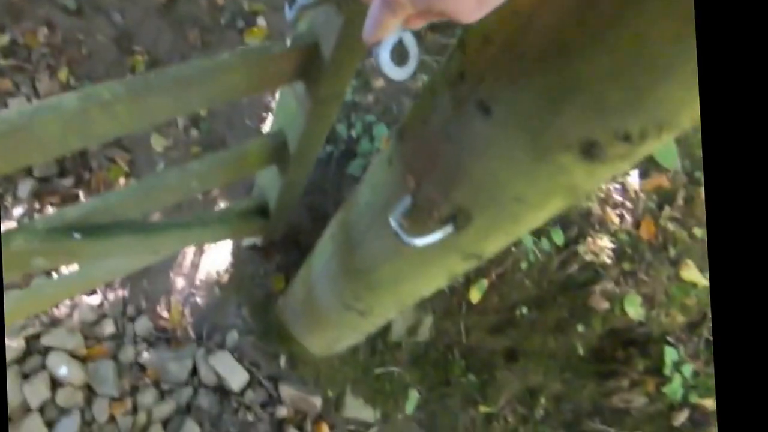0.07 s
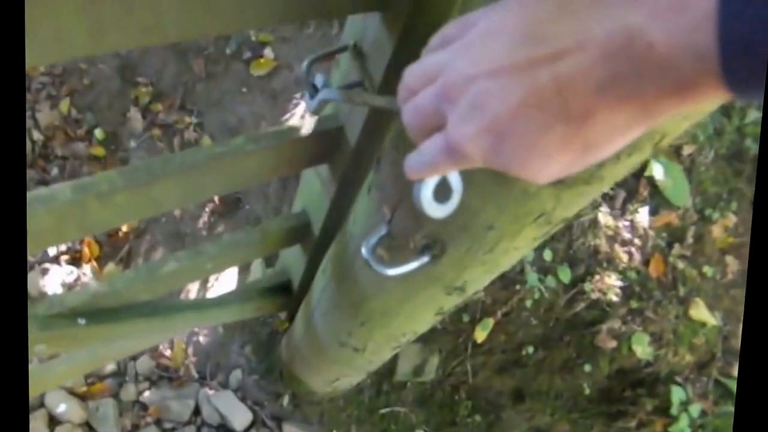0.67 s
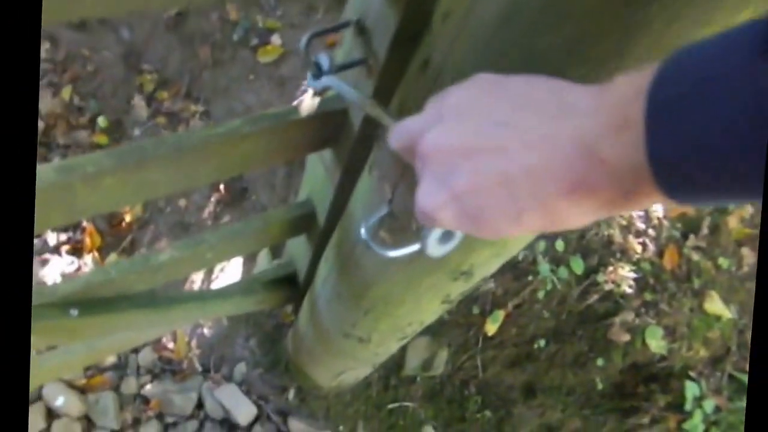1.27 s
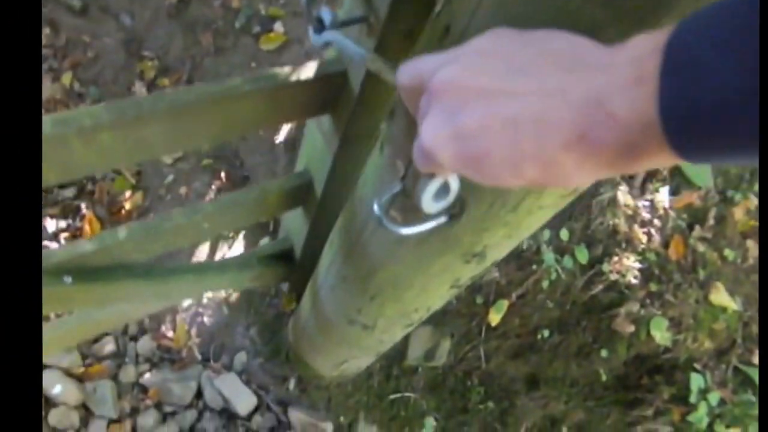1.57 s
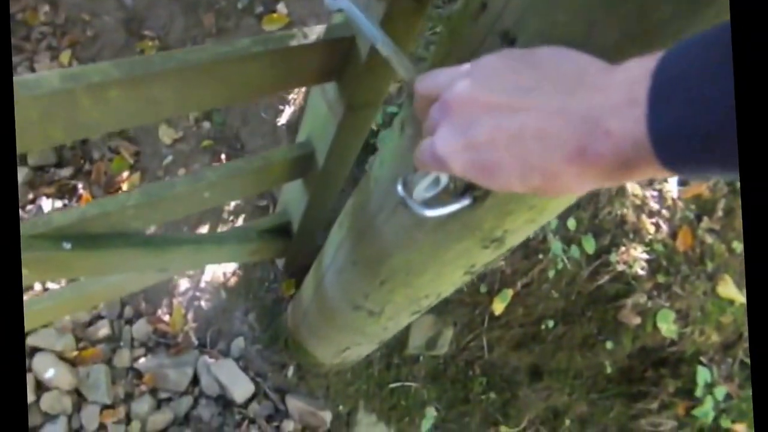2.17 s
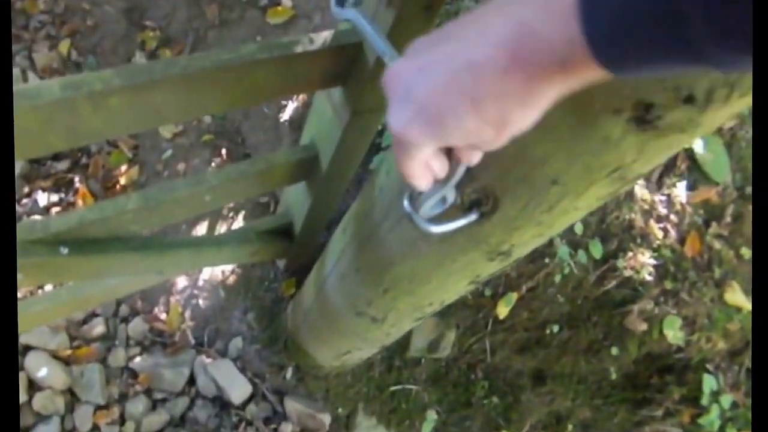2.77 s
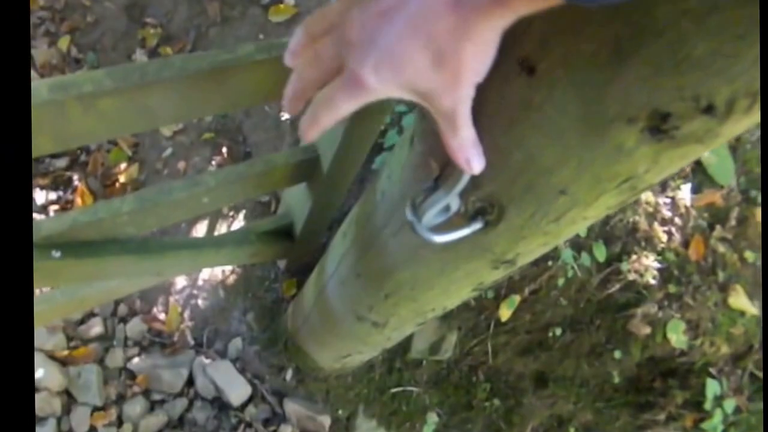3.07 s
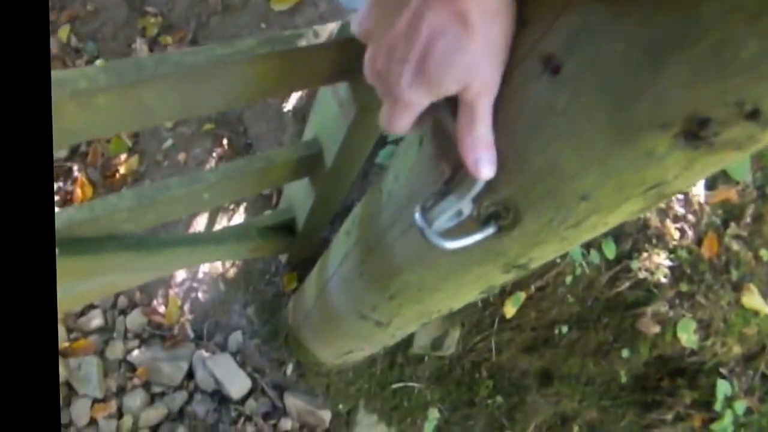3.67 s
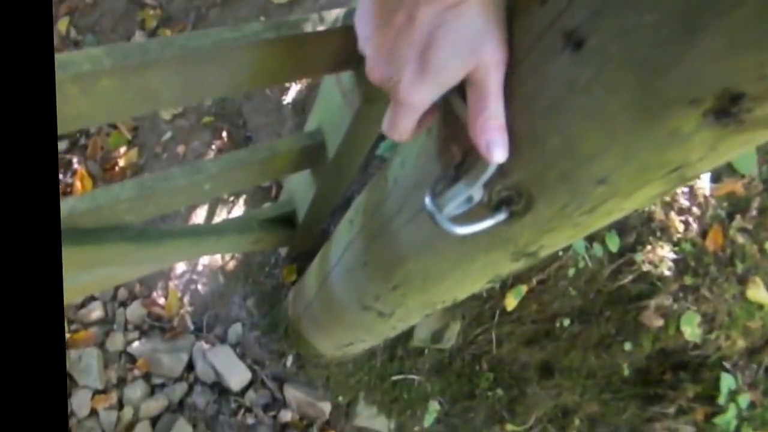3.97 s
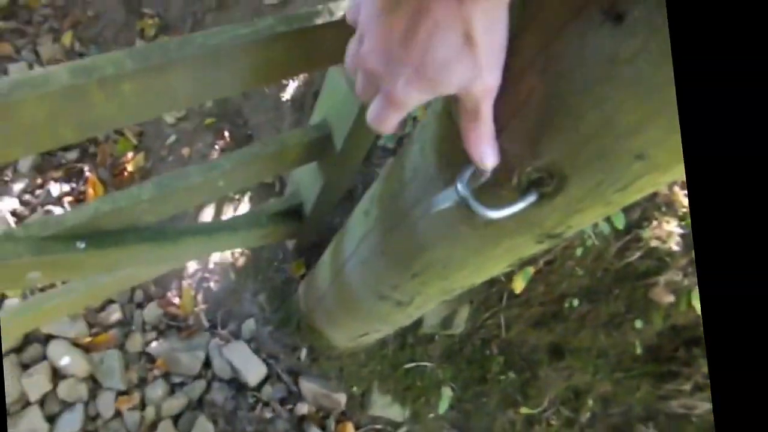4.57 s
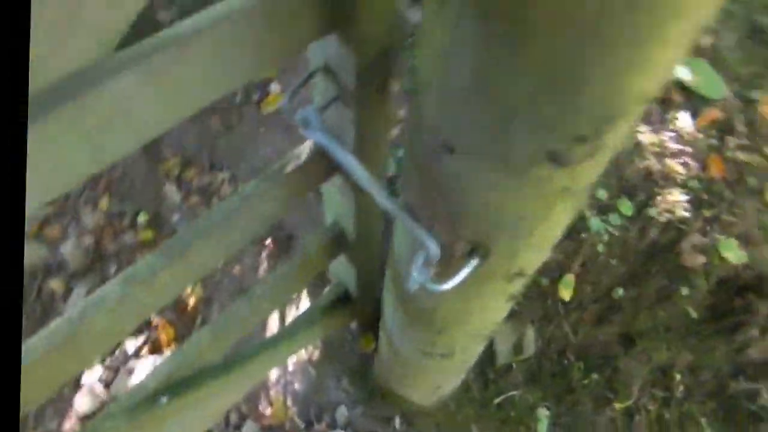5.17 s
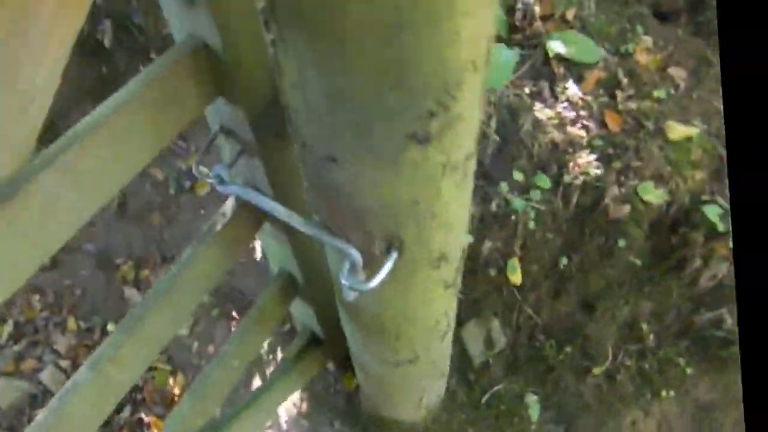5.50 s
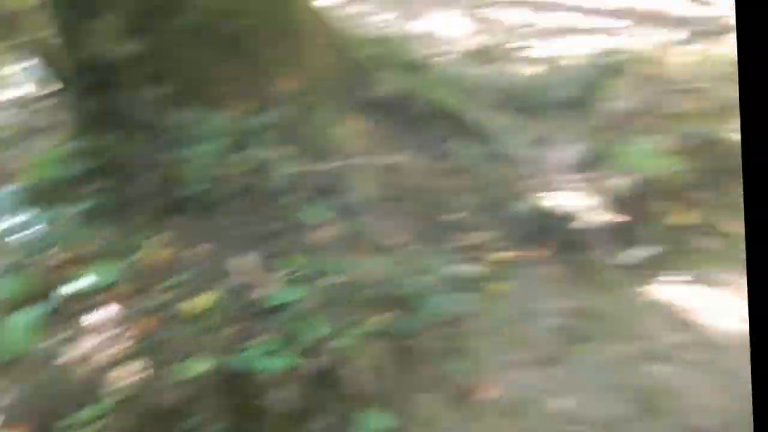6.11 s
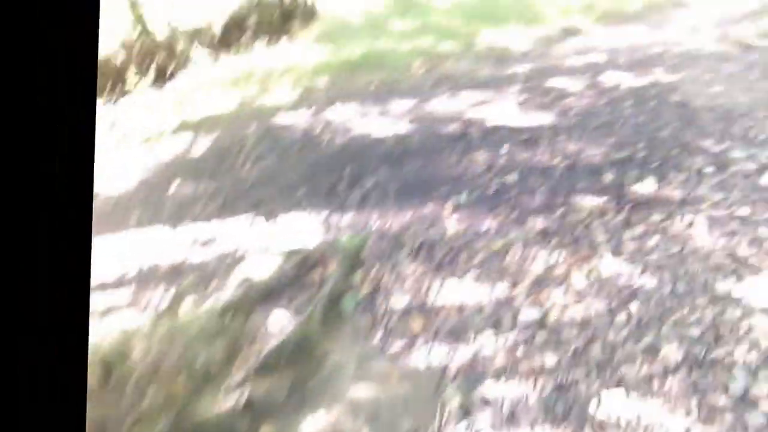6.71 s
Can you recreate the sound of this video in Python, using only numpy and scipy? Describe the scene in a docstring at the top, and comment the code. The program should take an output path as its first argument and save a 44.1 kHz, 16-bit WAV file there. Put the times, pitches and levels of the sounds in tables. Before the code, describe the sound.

Outdoors, over a faint hush of far leaves, a steel gate hook is worked by hand into its staple right by the microphone. After some handling bumps come two bouts of metal clacks and grinding, the second louder and with a brief squeak, with soft sleeve swishes between. The released hook rattles and rings as the wooden gate knocks, then stops. A few gravel steps and a low wind rumble follow.

```python
"""A steel gate hook, worked by hand into the staple on a wooden post, close up and outdoors.
Held, it clacks, grinds and squeals as steel sticks and slips on steel, and the gate knocks under it.
Let go, it is jolted taut and dropped slack by turns, bouncing and ringing until it seats.
A sleeve swishes and fingers bump the microphone over a bed of far leaves and a faint drone.
Gravel snaps underfoot and low gusts of wind roll in as the walker turns away."""
import sys
import numpy as np
from scipy import signal
from scipy.fft import rfft, irfft
from scipy.io import wavfile
from scipy.ndimage import uniform_filter1d

SR = 44100
rng = np.random.default_rng(int(sys.argv[2]) if len(sys.argv) > 2 else 0)


def output_pcm(signal):
    """Save a mono or channel-first signal as 16-bit PCM at the path in sys.argv[1].

    Samples are clipped to [-1, 1] before scaling.
    """
    pcm = np.clip(np.atleast_2d(signal).T, -1, 1) * 32767
    wavfile.write(sys.argv[1], SR, np.round(pcm).astype(np.int16))


N = 301984
TIME = np.arange(N) / SR
SEATED_S, WALK_S = 5.162, 5.97  # the hook comes to rest; the walker turns away
USUAL_HARD_HZ, FIRM_DB = 4000, -30  # reference points: an ordinary contact, a firm push

# tone of the distant leaves: freq_hz, level_db
LEAVES_EQ = [(20, -43), (45, -8), (85, -12.5), (130, -6), (200, -2), (400, -1.5), (800, -1), (1150, -6.5),
             (2100, -7.5), (3500, -12.5), (6000, -18), (10000, -24), (16000, -31)]
# how alike the leaves sound left and right: freq_hz, correlation
LEAVES_LIKENESS = [(60, 0.46), (130, 0.56), (290, 0.737), (640, 0.904), (1410, 0.863), (3100, 0.782),
                   (6820, 0.66), (15000, 0.69)]
# fingers and cuff on the microphone, and around 5.4 s soft footsteps or gate knocks: middle_s, length_s,
# level_db, pitch_hz
BUMPS = [(0.042, 0.0244, -37.5, 395), (.074, 0.013, -27, 376), (0.083, 0.0101, -26, 433),
         (0.09, 0.021, -19, 424), (0.108, 0.022, -26, 400), (0.123, 0.019, -21, 432),
         (0.163, 0.012, -26.5, 341), (0.176, 0.026, -31, 295.6), (0.197, .018, -33.5, 462),
         (0.345, 0.0144, -38.5, 370), (3.062, 0.026, -45, 707), (3.532, .019, -42, 460),
         (5.331, 0.0316, -34.5, 389), (5.362, 0.048, -40.5, 460), (5.453, 0.0545, -44.5, 429),
         (5.51, .015, -41, 446.3)]
# tone of the cloth crackle in a bump: freq_hz, level_db
CRACKLE_EQ = [(100, 8), (250, 12), (800, -19.5), (1500, 5.5), (2400, -10), (4000, -0.5), (7000, -1),
              (10000, -9), (16000, -17)]
# sleeve strokes: middle_s, stroke_s, level_db, tilt_db_per_octave, grain_spread_db
SWISHES = [(0.04, 0.07, -52, 2, 3), (0.097, 0.05, -38, 2, 2), (0.165, 0.14, -44.5, 1.6, 2.5),
           (.72, .17, -53.5, 3.8, 2), (.89, .2, -56, 1, 2), (1.889, 0.473, -59, 0.5, 2),
           (2.79, 0.13, -49, 2.5, 2), (3.058, .1, -60.5, 3, 3), (3.161, 0.0818, -44, -.5, 2),
           (3.502, 0.23, -56, 1.5, 3), (3.635, .14, -43.5, -.7, 2), (3.95, 0.125, -46, -1, 2),
           (4.07, 0.085, -45.5, 1, 2), (5.225, 0.15, -54, 1, 7), (5.352, 0.07, -42, 0.5, 4.5),
           (5.445, 0.15, -44, 0.5, 5), (5.572, 0.098, -45, 1.8, 4), (6.275, 0.15, -45, 1.3, 6),
           (6.44, 0.14, -49, -.5, 5), (6.825, .05, -46, 1.5, 6)]
# tone of the rubbing sleeve: freq_hz, level_db
SLEEVE_EQ = [(150, -10), (500, -2.5), (1500, 4), (3500, 3.5), (6000, -1), (10000, -7.5), (16000, -14)]
# sharp snaps of cloth, twigs and gravel: start_s, level_db, pitch_hz, t60_s
SNAPS = [(.0393, -34, 5000, .012), (0.0894, -21.5, 1700, 0.013), (0.0963, -22, 6160, 0.0108),
         (.162, -25.5, 746, 0.019), (.177, -29, 1400, .02), (0.1195, -12.5, 6000, 0.0098),
         (.1314, -23, 6940, 0.02), (1.3225, -44, 5000, .012), (3.8012, -31, 6620, 0.0155),
         (5.34, -29, 4000, 0.02), (5.348, -35, 10000, .02), (5.417, -39, 11000, .012),
         (5.447, -33, 5500, .018), (5.478, -41, 8500, .012), (5.495, -37, 6500, .014),
         (5.509, -18, 2900, 0.01), (5.5285, -35, 7000, .012), (5.606, -39, 10500, .012),
         (5.608, -33, 3000, 0.0091), (6.028, -40, 10000, .012), (6.057, -35, 2090, 0.02),
         (6.423, -40, 6000, .02), (6.5488, -31, 6450, 0.0075), (6.727, -35, 3300, .015),
         (6.754, -29, 840, 0.085), (6.767, -20, 1600, 0.03), (6.829, -35, 3300, .02)]
# soft thuds of gate, hand and feet: start_s, relative_db, pitch_hz, t60_s
THUDS = [(0.922, -34, 170, 0.112), (.944, -42.5, 267, 0.39), (2.073, -36.5, 205, 0.3),
         (2.226, -36, 295, 0.34), (4.686, -46, 58, 0.2), (4.686, -30, 290, 0.15), (5.99, -39, 220, .1),
         (6.108, -30, 130, 0.081), (6.173, -29.5, 135, 0.08), (6.311, -27.5, 135, 0.033),
         (6.334, -34, 440, .035)]
# modes of the hook hanging free: pitch_hz, level_db, t60_s
HOOK_MODES = [(1525, -5, .16), (2536, -3, .13), (2900, -4, .1), (4200, -6, .19), (4850, -10, .2),
              (5605, -10, .2), (6118, -5, .14), (7308, -6, .22), (7960, -5, .16), (8344, -5, .18),
              (9358, -6, .11), (10889, -12, .27), (12210, -13, .12), (14665, -23, .15), (15305, -17, .17)]
# modes of the hook pressed on the staple: pitch_hz, level_db, t60_s
STAPLE_MODES = [(996, 2, 0.007), (1236, -15, 0.12), (1373, -16, 0.173), (1525.6, 0, 0.047),
                (1870, 6, 0.018), (1942, -2, 0.041), (2605, 8, 0.02), (3276, 11, 0.034), (3683, 7, 0.051),
                (5240, 3, 0.022), (5550, 13, 0.0143), (6412, 10.5, 0.013)]
# modes of the wooden gate and post: pitch_hz, level_db, t60_s
TIMBER_MODES = [(127.2, -10, 0.093), (195, -10, 0.2), (279, -1, 0.14), (376, 1, 0.13), (432, 0, 0.12),
                (520, 1, 0.07), (577, 5, 0.09), (640, 2, 0.06), (764, 6, 0.05), (860, 2, 0.05),
                (964, -2, 0.05)]
# broad tone of steel hitting steel: freq_hz, level_db
CLACK_EQ = [(100, -19), (350, -8), (700, 0), (1100, -3.5), (1600, 1), (1950, 2), (2270, -7), (2650, -0.5),
            (3100, 0), (4200, -8.5), (5600, -7), (8000, -10), (11000, -8.5), (16000, -9.5)]
# the hand pushes the hook against the staple (looseness runs from 0, gripped, to 1, free):
# start_s, level_db, hardness_hz, pinch_hz, favoured_hz, looseness
PUSHES = [(1.444, -28, 4050, 1630, 3000, 0.02), (2.0669, -12, 7000, 1710, 4850, 0.28),
          (2.0700, -15.5, 6500, 2780, 5610, 0.03), (2.1622, -28.5, 4760, 1296, 5600, 0.01),
          (2.2302, -22.5, 4200, 2030, 6100, .1), (2.3068, -11.5, 4000, 2625, 2520, 0.01),
          (2.356, -27, 2600, 1650, 3100, 0.1), (2.404, -25, 1980, 843, 3050, 0.02),
          (3.747, -31, 1223, 804, 2550, 0.4), (3.799, -35, 1200, 820, 2550, .1),
          (3.833, -36, 1300, 850, 2550, .1), (4.2212, -28, 4720, 1180, 7300, 0.05),
          (4.2592, -13.5, 2400, 1070, 3070, 0.3), (4.2836, -17, 3600, 1800, 7300, .1),
          (4.295, -4, 3600, 1500, 5650, .08), (4.3215, -25, 3000, 1900, 6100, .2),
          (4.3373, -22, 3020, 2920, 3084, 0.52), (4.4134, -10.5, 12000, 1680, 5700, 0.22),
          (4.4268, -13.5, 9800, 3226, 7300, 0.31), (4.4338, -17, 6030, 2050, 5600, 0.05),
          (4.4685, -24.5, 5170, 2800, 5600, 0.38), (4.5175, -22, 4250, 1520, 1530, 0.6),
          (4.5265, -27.5, 4000, 3500, 1530, .3)]
# the swinging gate pulls the hook taut: start_s, level_db, hardness_hz, pinch_hz, knock_db, knock_hz
JOLTS = [(2.2225, -16, 4600, 780, -16.5, 780), (4.6821, -8, 7350, 2800, -14.5, 540),
         (4.7348, -18, 3980, 1900, -21.5, 520), (4.8771, -21, 3900, 2900, -21.5, 700),
         (5.0645, -18, 6100, 1700, -20, 570)]
# the slack hook lands on the staple, each drop followed by a rebound:
# start_s, level_db, hardness_hz, pinch_hz, ring_offset_db, favoured_hz, spread_ratio, looseness
DROPS = [(4.7834, -15.5, 10100, 1398, -11.5, 8250, 0.05, 1),
         (4.7945, -17, 6000, 1450, -12.5, 2536, 0.05, 0.97),
         (5.004, -19.5, 7610, 1706, -14, 7960, 0.05, 0.95),
         (5.0125, -19, 4500, 1100, -13, 7308, 0.04, 0.88), (5.1253, -20, 6000, 1150, -16, 12210, 0.1, 0.8),
         (5.1325, -19.5, 4000, 1900, -17, 7308, 0.04, 0.8)]
# the hook drags on the staple until it gives: peak_s, build_s, release_s, rasp_db, groan_db, groan_hz
DRAGS = [(2.224, 0.028, 0.03, -35, -29, 780), (2.242, .01, .035, -42, -26, 600),
         (2.276, 0.008, 0.045, -43, -30, 380), (4.292, 0.0446, 0.016, -23.5, -30, 640),
         (4.32, .015, 0.055, -31, -26.5, 540), (4.42, 0.033, 0.035, -26.5, -25, 585),
         (4.475, 0.015, 0.051, -36.5, -35, 620), (4.535, 0.029, .08, -32.5, -33, 770),
         (4.645, 0.028, 0.025, -44, -34.5, 430), (4.679, .02, 0.002, -40, -28, 420),
         (4.733, 0.01396, 0.0026, -35, -34, 520), (4.853, 0.00457, 0.018, -45, -41, 500),
         (5.126, 0.0089, 0.0035, -33, -42, 600)]
# path of the squeak just before the hook gives: time_s, slip_rate_hz, level_db
SQUEAK_CURVE = [(4.249, 650, -50), (4.253, 630, -25), (4.268, 650, -28), (4.279, 635, -21.5),
                (4.286, 622, -15), (4.295, 622, -20), (4.304, 665.3, -26), (4.309, 650, -39)]
# overtones of the squeak: harmonic_number, level_db
SQUEAK_PARTIALS = [(1, -19), (2, -1), (3, 0.5), (4, -20), (5, -11.5), (6, -14), (7, -22.5), (8, -19),
                   (9, -29), (10, -30), (12, -24)]
# path of the squeal under the hardest push: time_s, pitch_hz, level_db
SQUEAL_CURVE = [(4.25, 1040, -36), (4.26, 1080, -18.5), (4.269, 1140, -31), (4.278, 1280, -23),
                (4.294, 1410, -19), (4.308, 1400, -34)]
# gusts on the microphone: peak_s, relative_db, fall_db_per_s
GUSTS = [(6.09, -34, 124.5), (6.33, -37, 31.5)]
# tone of the wind rumble: freq_hz, level_db
WIND_EQ = [(15, -16.5), (40, -13), (90, -1), (160, -8.5), (300, -17), (600, -39), (2000, -73.5)]
# a shoe scuffs the path: middle_s, length_s, level_db, pitch_hz, width_hz
SCUFFS = [(6.058, .03, -39, 2170, 250), (6.249, 0.053, -35.5, 568, 520), (6.28, 0.12, -38.5, 730, 900),
          (6.536, 0.41, -48, 1930, 257), (6.751, 0.288, -48, 1840, 600)]
# stereo balance of the microphone: freq_hz, left_minus_right_db
BALANCE = [(60, 2), (110, 1), (200, 1.0), (380, 1), (700, 1), (1290, 0), (2380, 1), (4400, 2.0), (8120, 2),
           (15000, 0)]


def amp(db):
    """Decibels to gain."""
    return 10 ** (np.asarray(db) / 20)


def unit_rms(x):
    """Scales to an rms of one."""
    return x / np.sqrt(np.mean(x ** 2) + 1e-20)


def curve_at(points, hz):
    """Reads a table on a log-frequency axis."""
    freq, value = np.transpose(points)
    return np.interp(np.log(hz + 1), np.log(freq + 1), value)


def add(mix, s, sound):
    """Mixes a sound in, starting at s seconds."""
    part = mix[max(round(s * SR), 0):][:len(sound)]
    part += sound[:len(part)]


def colour(x, eq, tilt_db=0):
    """Applies an EQ curve and a tilt per octave, at unit level."""
    hz = np.fft.rfftfreq(len(x), 1 / SR)
    gain = amp(curve_at(eq, hz) + tilt_db * np.log2(hz / 1000 + .5))
    return unit_rms(irfft(rfft(x) * gain, len(x)))


def band(hz, width_hz, size=16384):
    """Noise in one resonance, at unit level."""
    freq = np.fft.rfftfreq(size, 1 / SR) + 1
    off_centre = (freq * freq - hz * hz) / (freq * width_hz)
    return unit_rms(irfft(rfft(rng.standard_normal(size)) / (1 + off_centre ** 2) ** 0.75, size))


def wobble(size, smooth):
    """Random modulation at unit level, smoothed over a number of samples."""
    return unit_rms(uniform_filter1d(rng.standard_normal(size), size=smooth))


def grains(spread_db, size=16384):
    """Noise made of tiny snaps of very uneven size."""
    return rng.standard_normal(size) * amp(spread_db * np.minimum(rng.exponential(1, size), 5))


def soften(x, hz, order=3):
    """Low-pass: a softer contact lasts longer and excites less treble."""
    return signal.sosfilt(signal.butter(order, min(hz, .4 * SR), fs=SR, output="sos"), x)


def low_cut(x, hz=130):
    """High-pass: thin, narrow things radiate little bass."""
    return signal.sosfilt(signal.butter(3, hz, "high", fs=SR, output="sos"), x)


def shaped(x, envelope):
    """Lays an envelope on a signal and gives it that envelope's energy."""
    y = x * envelope
    return y * np.sqrt(np.sum(envelope ** 2) / (np.sum(y ** 2) + 1e-20))


def burst(x, t60, rise_s=0.00017):
    """A fast attack and an exponential decay."""
    t = TIME[:len(x)]
    return shaped(x, amp(-60 * t / t60) * (1 - np.exp(-t / rise_s)))


def swell(x, length_s):
    """One smooth rise and fall."""
    return shaped(x, np.sin(np.pi * np.minimum(TIME[:len(x)] / length_s, 1)))


def ring(modes, vary_db, detune, size=16384):
    """Decaying modes, starting at unit level; each contact weights and tunes them a little differently."""
    hz, db, t60 = np.transpose(modes)[:, :, None]
    luck, shift, polarity = rng.standard_normal((3, len(modes), 1))
    gain, t = amp(db + vary_db * luck), TIME[:size]
    tones = np.sign(polarity) * np.sin(2 * np.pi * hz * (1 + detune * shift) * t)
    return (gain * amp(-60 * t / t60) * tones).sum(0) / np.sqrt(np.sum(gain ** 2) / 2)


def favour(modes, centre_hz, lift_db, spread):
    """The point of contact brings out the modes around one pitch."""
    return [(hz, db + lift_db * np.exp(-(np.log(hz / centre_hz) / spread) ** 2), t60)
            for hz, db, t60 in modes]


def woods(hush_db=-48, walk_lift_db=3, turn_s=0.039, whine_hz=11176, whine_db=-76.5):
    """A bed of far leaves that lifts as the walker turns, with a thin, faint whine on top."""
    likeness = curve_at(LEAVES_LIKENESS, np.fft.rfftfreq(N, 1 / SR))
    left, other = rfft(rng.standard_normal((2, N)))
    right = likeness * left + np.sqrt(1 - likeness ** 2) * other
    hush = np.array([colour(irfft(side, N), LEAVES_EQ) for side in (left, right)])
    turned = np.clip((TIME - WALK_S) / turn_s + .5, 0, 1)
    level = amp(hush_db + walk_lift_db * turned + .4 * wobble(N, 3000))
    return hush * level + amp(whine_db) * band(whine_hz, width_hz=130, size=N)


def drone(hz=59.2, db=-70.5):
    """A faint, steady low tone under the leaves."""
    return np.sqrt(2) * amp(db) * np.sin(2 * np.pi * hz * TIME)


def sleeve(crease_db=1.6, overhang=1.25, size=32768):
    """Rubbing cloth swishes in fine grains, its folds catching in clumps."""
    out = np.zeros(N)
    for s, stroke_s, db, tilt_db, grain_db in SWISHES:
        creases = amp(crease_db * wobble(size, 260))
        rub = colour(grains(grain_db, size), SLEEVE_EQ, tilt_db)
        length = overhang * stroke_s  # the cloth moves before the stroke and settles after it
        add(out, s - length / 2, amp(db) * swell(creases * rub, length))
    return out


def hollow_bumps(firm_crackle_db=-38, crackle_growth=0.93):
    """A soft push rocks one hollow resonance for a few cycles; cloth crackles with the force."""
    out = np.zeros(N)
    for s, length, db, hz in BUMPS:
        rock = np.sqrt(2) * np.sin(2 * np.pi * (hz * TIME[:16384] + rng.random()))
        knock = swell(unit_rms(rock + band(hz, width_hz=138.3)), length)
        crackle = swell(colour(grains(spread_db=6), CRACKLE_EQ), length)
        crackle_db = firm_crackle_db + crackle_growth * (db - FIRM_DB)
        add(out, s - length / 2, amp(db) * knock + amp(crackle_db) * crackle)
    return out


def snaps():
    """Cloth, twigs and gravel snap: each one broad resonance, sharply struck."""
    out = np.zeros(N)
    for s, db, hz, t60 in SNAPS:
        snap = burst(band(hz, 0.55 * hz), t60)
        add(out, s, amp(db) * soften(snap, 1.9 * hz, order=5))
    return out


def thuds(lift_db=2.5):
    """Gate, hand and feet thud: each one low resonance with a blunt attack."""
    out = np.zeros(N)
    for s, db, hz, t60 in THUDS:
        add(out, s, amp(db + lift_db) * burst(band(hz, 0.63 * hz), t60, rise_s=0.00077))
    return out


def hook_ring(favoured_hz, loose, spread=0.066, muffle_db_per_octave=12):
    """Gripping fingers shorten the partials, muffle the highest most and leave mainly the favoured one."""
    grip = max(1 - loose, 0)
    held = []
    for hz, db, t60 in favour(HOOK_MODES, favoured_hz, lift_db=10 + 20 * grip, spread=spread):
        muffle_db = muffle_db_per_octave * grip * max(np.log2(hz / 4000), 0)
        held.append((hz, db - muffle_db, t60 * loose * min(4000 / hz, 1) ** grip))
    return ring(held, vary_db=2.5, detune=0.000375)


def timber(knock_hz):
    """The gate's modes, weighted by where the force meets the wood."""
    return ring(favour(TIMBER_MODES, knock_hz, lift_db=8, spread=0.16), vary_db=2.5, detune=0.014)


def clack_t60(db, hard_hz, usual_t60=0.054, usual_db=-19, halving_db=15.5, halving_octaves=3.7):
    """The harder the steel is pressed and struck, the sooner its clack dies."""
    halvings = (db - usual_db) / halving_db + np.log2(hard_hz / USUAL_HARD_HZ) / halving_octaves
    return usual_t60 * 2 ** -halvings


def choke(s, fall_db_per_s=900, grace_s=.04, size=16384):
    """An envelope that cuts the ring when the hook next lands, or seats for good."""
    landings = [row[0] for row in PUSHES + JOLTS + DROPS if row[0] > s + grace_s]
    landing_s = min(landings + [SEATED_S])
    return amp(-fall_db_per_s * np.maximum(s + TIME[:size] - landing_s, 0))


def hit(s, db, hard_hz, pinch_hz, t60, knock_db, knock_hz, chime, size=16384):
    """One hit in three layers: a clack pitched by where the steel is pinched, a wood knock, the chime."""
    crack = burst(colour(rng.standard_normal(size), CLACK_EQ), t60=0.0099, rise_s=.0001)
    body = burst(colour(rng.standard_normal(size), CLACK_EQ), t60)
    # a firm contact damps the staple's modes
    damped = [(hz, mode_db, min(life, 0.75 * t60)) for hz, mode_db, life in STAPLE_MODES]
    steel = ring(damped, vary_db=4.5, detune=0.018)
    pinch = burst(band(pinch_hz, 0.1 * pinch_hz), 0.6 * t60)
    clack = soften(amp(1.3) * crack + amp(-4.5) * body + amp(-6) * steel + amp(-5) * pinch, hard_hz)
    knock = timber(knock_hz) * (1 - np.exp(-TIME[:size] / 0.0016))
    return amp(db) * clack + amp(knock_db) * knock + chime * choke(s)


def hook_pushes(post_hz=680, ring_offset_db=-8.5, ring_db_per_octave=7.5):
    """The held hook clacks on the staple; a harder contact or a looser grip lets it ring more."""
    out = np.zeros(N)
    for s, db, hard_hz, pinch_hz, favoured_hz, loose in PUSHES:
        knock_db = -29 + 0.4 * (db + 25.5)  # the post follows the force only in part
        ring_db = db + ring_offset_db + ring_db_per_octave * np.log2(hard_hz / USUAL_HARD_HZ)
        chime = loose * amp(ring_db) * hook_ring(favoured_hz, loose)
        add(out, s, hit(s, db, hard_hz, pinch_hz, clack_t60(db, hard_hz), knock_db, post_hz, chime))
    return out


def hook_drags(span_db=12, firm_slips_per_s=300, firm_rasp_hz=1494, size=16384):
    """Steel sticks and slips: uneven pulses drive staple and gate, faster and brighter under pressure."""
    out, t = np.zeros(N), TIME[:size]
    for s, build, release, db, groan_db, groan_hz in DRAGS:
        pressure_db = db - FIRM_DB
        # beyond a firm push, the modes near the squeal stand out
        modes = favour(STAPLE_MODES, 1320, lift_db=0.57 * max(pressure_db, 0), spread=0.21)
        damped = [(hz, mode_db, 0.74 * t60) for hz, mode_db, t60 in modes]
        slack = np.maximum(1 - t / build, (t - build) / release)  # 0 at the peak, 1 at both ends
        force = amp(-span_db * slack) * (slack <= 1)
        rate = firm_slips_per_s * 2 ** ((pressure_db - span_db * slack) / 45.5)
        rate *= np.exp(.12 * wobble(size, 120))
        slips = np.diff(np.floor(np.cumsum(rate) / SR), prepend=0)
        drive = force * (slips * rng.uniform(0.1, 1.02, size) + 0.12 * rng.standard_normal(size))
        steel = unit_rms(signal.fftconvolve(drive, ring(damped, vary_db=6, detune=0.0034))[:size])
        groan = unit_rms(signal.fftconvolve(drive, timber(groan_hz))[:size])
        cutoff_hz = firm_rasp_hz * 2 ** (pressure_db / 20)
        rasp = unit_rms(soften(steel + amp(-7) * colour(drive, CLACK_EQ), cutoff_hz))
        add(out, s - build, np.sqrt(np.mean(force ** 2)) * (amp(db) * rasp + amp(groan_db) * groan))
    return out


def gate_jolts(ring_offset_db=-12):
    """The swinging gate snaps the hook taut: a heavy wood knock with a half-damped ring."""
    out = np.zeros(N)
    for s, db, hard_hz, pinch_hz, knock_db, knock_hz in JOLTS:
        chime = amp(knock_db + ring_offset_db) * hook_ring(favoured_hz=2900, loose=0.5)
        add(out, s, hit(s, db, hard_hz, pinch_hz, clack_t60(db, hard_hz), knock_db, knock_hz, chime))
    return out


def squeak(jitter=.025, flutter_db=5.0, size=4096):
    """Under the hardest push the slips lock into a short, rough, pitched squeak."""
    s, hz, db = np.transpose(SQUEAK_CURVE)
    t = s[0] + TIME[:size]
    cycles = np.cumsum(np.interp(t, s, hz) * (1 + jitter * wobble(size, 50))) / SR
    tone, out = np.zeros(size), np.zeros(N)
    for harmonic, partial_db in SQUEAK_PARTIALS:
        gain = amp(partial_db + flutter_db * wobble(size, 90))
        tone += gain * np.sin(2 * np.pi * (harmonic * cycles + rng.random()))
    add(out, s[0], shaped(unit_rms(tone), amp(np.interp(t, s, db)) * (t < s[-1])))
    return low_cut(soften(out, hz=7000), hz=450)


def squeal(jitter=.04, flutter_db=3.0, size=4096):
    """The pinched steel sings on one unsteady note that climbs as the pressure builds."""
    s, hz, db = np.transpose(SQUEAL_CURVE)
    t = s[0] + TIME[:size]
    cycles = np.cumsum(np.interp(t, s, hz) * (1 + jitter * wobble(size, 70))) / SR
    tone = amp(flutter_db * wobble(size, 70)) * np.sin(2 * np.pi * cycles)
    out = np.zeros(N)
    add(out, s[0], shaped(tone, amp(np.interp(t, s, db)) * (t < s[-1])))
    return out


def hook_drops(t60=0.075, knock_offset_db=-11, knock_hz=600):
    """The slack hook falls on the staple and rebounds, clinking brightly over a light knock."""
    out = np.zeros(N)
    for s, db, hard_hz, pinch_hz, ring_offset_db, favoured_hz, spread, loose in DROPS:
        chime = amp(db + ring_offset_db) * hook_ring(favoured_hz, loose, spread)
        add(out, s, hit(s, db, hard_hz, pinch_hz, t60, db + knock_offset_db, knock_hz, chime))
    return out


def wind(rise_db_per_s=181, separation=2.4, lumps_db=2.0):
    """Lumpy low gusts rise fast and die away, largely separate at each microphone port."""
    shared, left, right = (colour(rng.standard_normal(N), WIND_EQ) for _ in range(3))
    rumble = unit_rms(shared + separation * np.array([left, right]))
    lumps = amp(lumps_db * wobble(N, 1200))
    gusts = sum(amp(db - np.maximum(rise_db_per_s * (s - TIME), fall * (TIME - s)))
                for s, db, fall in GUSTS)
    return rumble * gusts * lumps * amp([[-1.5], [-3.5]])  # left and right trims


def gravel(snaps_per_s=17, db=-53, spread_db=4.5, centre_hz=5200):
    """Bits of grit snap at random under the walker's shoes."""
    out = np.zeros(N)
    for s in np.arange(WALK_S, N / SR, 1 / snaps_per_s):
        late, strength, pitch = rng.uniform(-0.36, 1, 3)
        grit = burst(band(centre_hz * 2 ** (.5 * pitch), width_hz=3500), t60=0.081)
        add(out, s + .5 * late / snaps_per_s, amp(db + spread_db * strength) * grit)
    return out


def shoe_scuffs():
    """A sole rubs the path: one band of noise swells and fades."""
    out = np.zeros(N)
    for s, length, db, hz, width_hz in SCUFFS:
        add(out, s - length / 2, amp(db) * swell(band(hz, width_hz), length))
    return out


def echoes(x, t60, predelay_s=.004, size=32768):
    """Scattered reflections, different on each side."""
    decay = amp(-60 * TIME[:size] / t60) * (TIME[:size] > predelay_s)
    tails = [soften(rng.standard_normal(size), hz=12200) * decay for _ in range(2)]
    return np.array([signal.fftconvolve(x, tail / np.linalg.norm(tail))[:N] for tail in tails])


def scene(rails_db=-26.0, trees_db=-27, gap_hz=2270):
    """Gate and hand sit up front and centre; rails and trees echo faintly in a quiet wood."""
    latch = low_cut(hook_pushes() + gate_jolts() + hook_drops() + hook_drags()) + squeak()
    # hook and staple leave a narrow gap between their low and high modes
    latch = signal.lfilter(*signal.iirnotch(gap_hz, Q=9, fs=SR), latch) + squeal()
    handling = low_cut(hollow_bumps() + sleeve(), hz=101.5)
    near = latch + handling + snaps() + thuds() + shoe_scuffs() + gravel()
    space = amp(rails_db) * echoes(near, t60=0.094) + amp(trees_db) * echoes(near, t60=0.31)
    return near + space + woods() + drone() + wind()


def record(dry, skew_s=.000004, ceiling=.9, top_hz=16150):
    """The left side is a touch louder and a hair late; tall peaks round off and the very top is cut."""
    hz, side = np.fft.rfftfreq(N, 1 / SR), np.array([[1], [-1]])
    balance = amp(side * curve_at(BALANCE, hz) / 2)
    delay = np.exp(-1j * np.pi * hz * skew_s * side)
    ports = irfft(rfft(dry) * balance * delay, N)
    rounded = ports / (1 + (ports / ceiling) ** 4) ** .25
    high_cut = signal.firwin(511, top_hz, window=("kaiser", 9), fs=SR)
    return signal.oaconvolve(rounded, high_cut[None], "same")


dry = scene()
out = record(dry)
output_pcm(out)
```